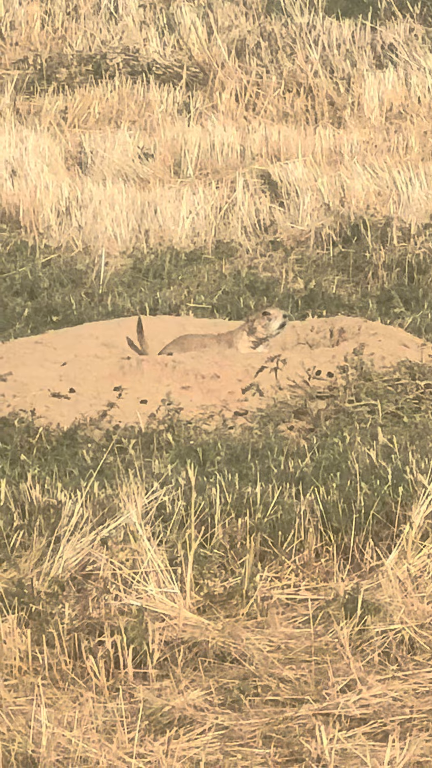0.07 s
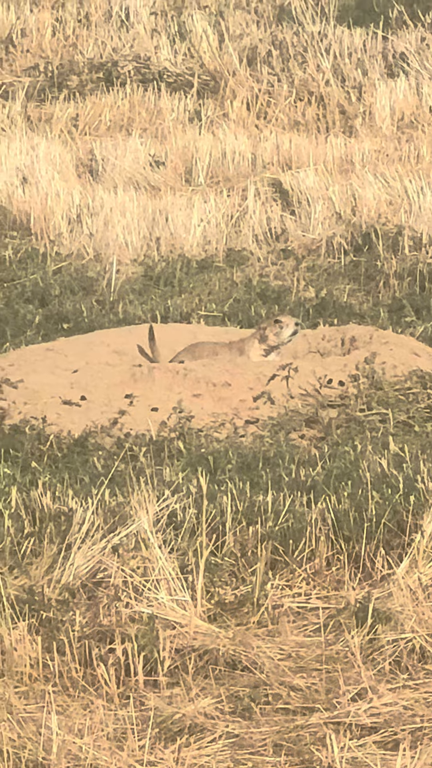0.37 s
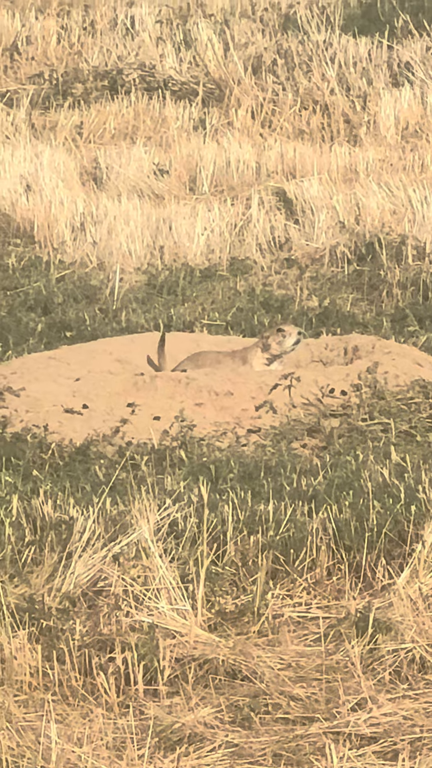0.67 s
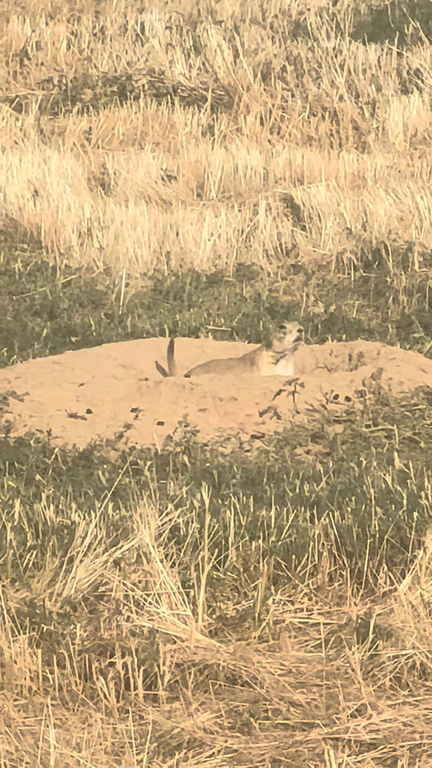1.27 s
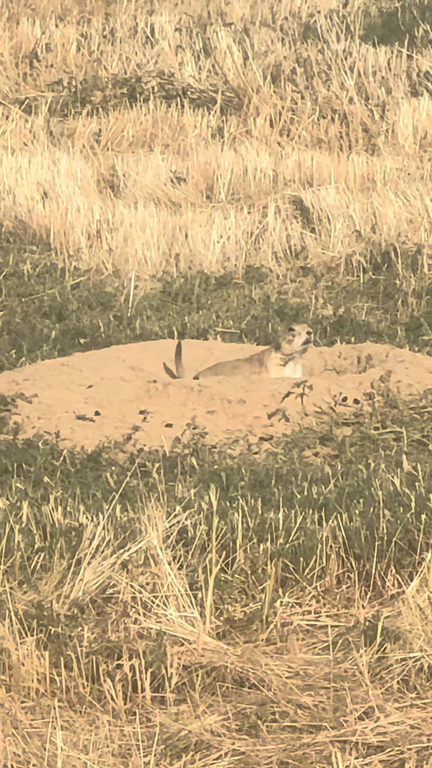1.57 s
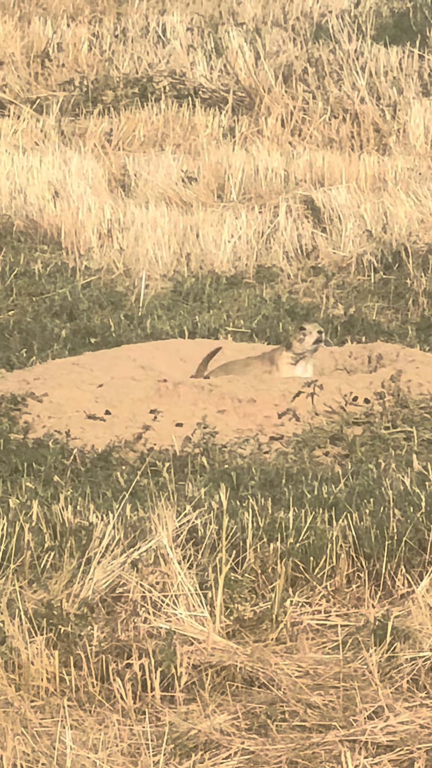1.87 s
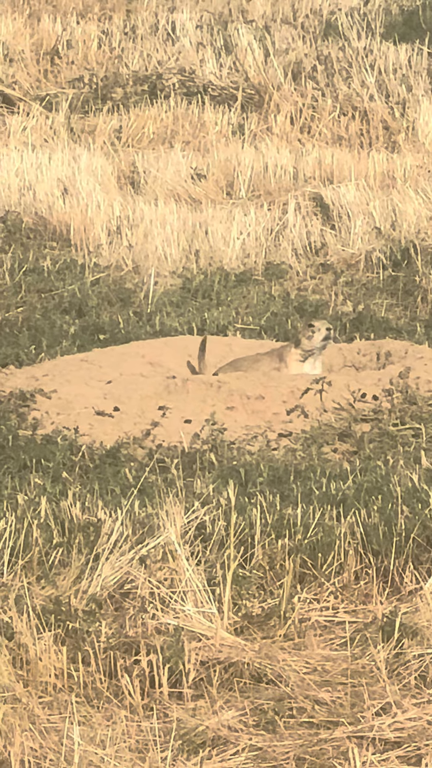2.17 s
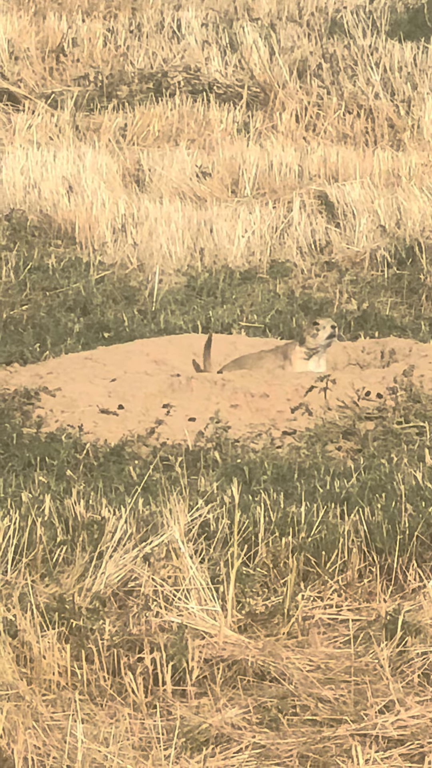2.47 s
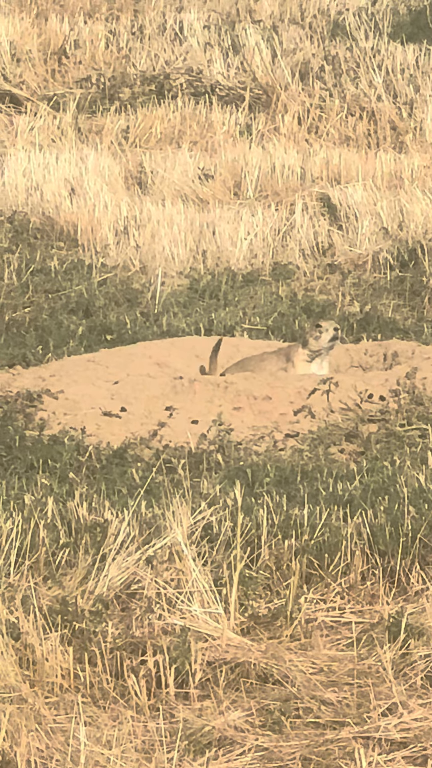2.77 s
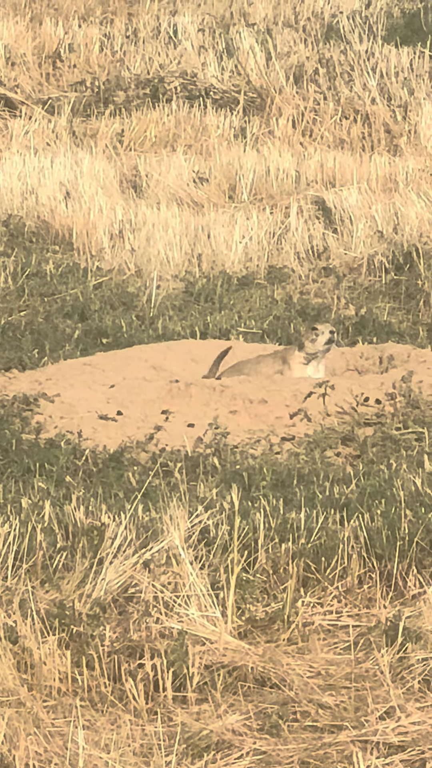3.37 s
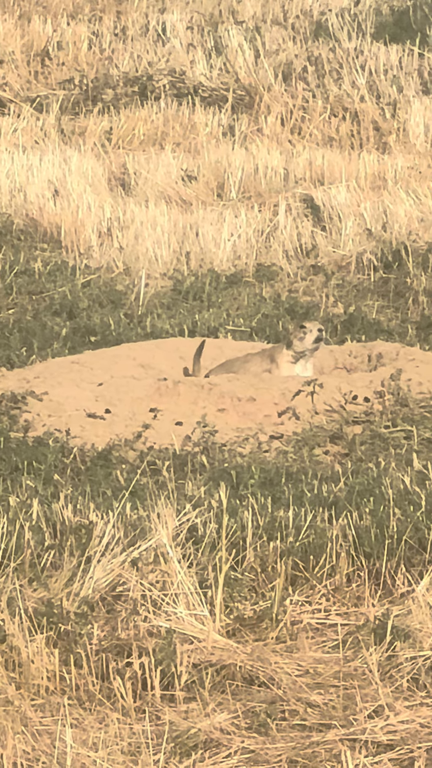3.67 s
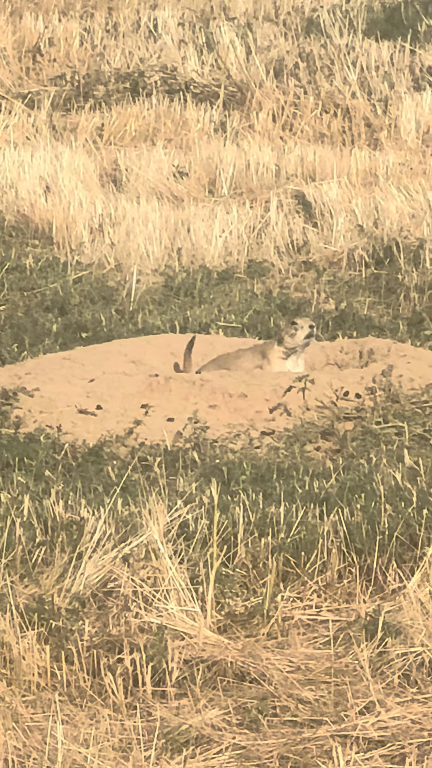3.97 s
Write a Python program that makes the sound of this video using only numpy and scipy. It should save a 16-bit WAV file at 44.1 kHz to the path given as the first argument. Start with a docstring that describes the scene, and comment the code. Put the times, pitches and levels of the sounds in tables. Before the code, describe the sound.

A prairie dog gives twelve short, shrill, slightly raspy barks, about three a second, from 0.1 to 3.7 seconds, loudest near 2 seconds. Another answers very faintly from about 1 second on. Low wind rumbles throughout and buffets the microphone between 2 and 3.2 seconds. A low engine hum and faint distant traffic lie underneath, with a few barely audible dry grass rustles and metal ticks.

```python
"""A prairie dog gives twelve short, shrill alarm barks from its mound; another answers far off.
Each bark rises and falls in pitch, is broken by two rough catches and rings in the animal's throat.
Dry grass rustles, metal ticks faintly, and wind buffets the microphone, hardest in the third second.
Far traffic and an engine hum lie underneath."""
import sys
import numpy as np
from scipy import signal
from scipy.fft import rfft, irfft
from scipy.io import wavfile

SR = 44100
rng = np.random.default_rng(int(sys.argv[2]) if len(sys.argv) > 2 else 0)


def wav_out(sig):
    """Save sig, one row per channel (or a flat mono array), as 16-bit PCM at SR to the path in sys.argv[1]."""
    wavfile.write(sys.argv[1], SR, np.round(np.clip(np.atleast_2d(sig).T, -1, 1) * 32767).astype(np.int16))


N = 176400  # 4 seconds

# The bright hiss in grass rustles and metal ticks. Columns: pitch_hz, level_db
CRISP_HISS = [(2000, -28.5), (4500, -13.5), (6000, 6), (7300, 4), (8700, 1.5), (10000, -5.5),
              (11500, -23.5), (13500, -20.5), (15000, -24), (17000, -32)]


def prairie_dog(t):
    """The near animal barks about three times a second."""
    # One row a bark; the peak is its highest pitch, and the two catches are timed from its start.
    # Columns: start_s, length_s, peak_hz, level_db, peak_place (share of the length),
    # first_catch_s, second_catch_s, roughness (0 to 1)
    barks = [(0.112, .047, 1680, -20.5, .33, 0.0043, .029, 0.66),
             (0.429, 0.046, 1580, -22, .48, 0.0047, 0.014, .45),
             (.777, .044, 1560, -24, .36, .007, 0.022, .9),
             (1.053, 0.048, 1665, -18.5, .42, 0.013, .031, 0.45),
             (1.468, .048, 1700, -17, .42, .016, 0.038, 0.43),
             (1.815, 0.046, 1560, -23, 0.55, 0.0072, .019, .45),
             (2.044, .046, 1710, -14.5, 0.32, .007, .024, 0.35),
             (2.357, .042, 1610, -19, .42, .016, 0.034, 0.58),
             (2.683, .039, 1580, -19.5, .5, 0.0168, .027, .45),
             (3.016, .040, 1600, -18, 0.25, 0.013, .027, 0.33),
             (3.368, 0.038, 1595, -18, 0.35, 0.0078, .016, 0.41),
             (3.691, 0.032, 1575, -18.5, 0.55, 0.0091, 0.011, 0.53)]
    return bark_voice(t, barks)


def bark_voice(t, barks):
    """Vocal folds buzz in an arch of pitch, clear at the top, rough at the ends and in the catches."""
    # How the throat favours some pitches. Columns: pitch_hz, gain_db
    throat = [(600, -41), (1250, -19.5), (1600, -23), (2050, -15), (2600, -1), (3200, -2), (3500, -3),
              (4000, -10), (4800, -8.5), (5200, -16), (5600, -17), (6500, -25), (7300, -44.5), (8300, -46),
              (10000, -43), (11500, -66), (15000, -83)]
    # How the half-closed mouth darkens both ends of a bark. Columns: pitch_hz, gain_db
    half_closed_mouth = [(1600, -3), (2600, 3), (3600, 0), (5000, -5), (6500, -12)]
    # Rushing air before the throat shapes it. Columns: pitch_hz, gain_db
    air_tone = [(1500, 1.5), (2100, -5), (3100, 4), (3800, 3), (5500, 1.5), (7000, -0.5), (9000, -2.5)]
    attack_s, release_s, catch_s = .003, .001, .0018
    sag_drop, catch_drop = .22, .065  # shares of the pitch lost at the ends and in a catch
    sag_db, catch_db, fade_db = -14, -6.5, -13.5
    fade_from = .53  # share of the length
    flutter_share, flutter_db, jitter_share = .011, 2.82, .048
    rasp_hz, breath_db = 561, 4
    pitch, loudness, rasp, closing = np.zeros((4, N))
    for start, length, peak_hz, level_db, peak_place, first, second, roughness in barks:
        on = (t >= start) & (t < start + length)
        age = t[on] - start
        progress = age / length
        # 0 at the top of the arch, 1 at both ends
        sag = np.maximum(1 - progress / peak_place, (progress - peak_place) / (1 - peak_place)) ** 2.5
        catch = bell((age - first) / catch_s) + bell((age - second) / catch_s)
        pitch[on] = peak_hz * (1 - sag_drop * sag - catch_drop * catch)
        edges = np.minimum(age / attack_s, 1) * np.minimum((length - age) / release_s, 1)
        fade = np.maximum(progress - fade_from, 0) / (1 - fade_from)
        loudness[on] = edges * undb(level_db + sag_db * sag + catch_db * catch + fade_db * fade ** 2)
        rasp[on] = roughness * (.3 + 1.36 * np.minimum(sag / 2 + catch + fade, 1))
        closing[on] = sag
    flutter = wander(hz=249)
    phase = phase_of(pitch * (1 + flutter_share * flutter + jitter_share * rasp * wander(hz=1600)))
    # A slower, uneven shake in pitch and strength makes the voice rough.
    shake = rasp * np.sin(phase_of(rasp_hz * (1 + .21 * wander(hz=250))))
    buzz = sum(np.cos(harmonic * (phase + .66 * shake)) for harmonic in range(1, 8)) * (1 + shake)
    air = colour(rng.standard_normal(N), air_tone)
    breath = undb(breath_db) * rasp * air * (1 + np.cos(phase))  # one puff per vibration
    voice = loudness * undb(flutter_db * flutter) * (buzz + breath)
    mouthed = (1 - closing) * voice + closing * colour(voice, half_closed_mouth)
    return colour(mouthed, throat)


def far_neighbour(t):
    """A second prairie dog answers from far away with faint, rough barks."""
    # Its answers. Columns: start_s, level_db
    answers = [(1.12, -52.5), (2.24, -55.5), (2.854, -51), (3.476, -46.5), (3.925, -51)]
    length_s, peak_hz, peak_place, catches_s, roughness = .05, 1780, .5, (.012, .022), .9
    barks = [(start, length_s, peak_hz, db, peak_place, *catches_s, roughness) for start, db in answers]
    return bark_voice(t, barks)


def field_echo(sound, t):
    """Mound and grass scatter a sound briefly, partly from the sides; the field adds a faint tail."""
    def echo(level_db, fade_s):
        """A smear of the sound that falls by 60 dB in fade_s."""
        tail = rng.standard_normal(N) * undb(-60 * t / fade_s)
        return undb(level_db) * signal.fftconvolve(sound, tail / np.linalg.norm(tail))[:N]
    middle = sound + echo(level_db=-13.5, fade_s=.055) + echo(level_db=-36.5, fade_s=.67)
    return middle + to_sides(echo(level_db=-20, fade_s=.055))


def grass(t):
    """Dry stalks brush together in short, crackly rustles, different at each ear."""
    # One row a rustle. Columns: middle_s, half_length_s, level_db
    rustles = [(.55, 0.028, -66), (1.04, .014, -59), (1.362, .018, -65), (2.752, 0.031, -56),
               (3.43, .02, -66)]
    crackle_db = 3
    stir = sum(undb(db) * bell((t - middle) / half_length) for middle, half_length, db in rustles)
    ears = [unit(noise(CRISP_HISS) * undb(crackle_db * wander(hz=300))) for _ in range(2)]
    return stir * np.array(ears)


def metal_ticks(t):
    """A small piece of metal near the microphone is touched lightly and rings unsteadily."""
    # One row a touch. Columns: start_s, level_db
    touches = [(.683, -61), (.71, -68), (0.732, -60), (.774, -50), (.948, -59), (.997, -63), (2.913, -55),
               (2.957, -62), (3.153, -63)]
    # The tones the metal rings with. Columns: pitch_hz, level_db, fade_s (time to fall by 60 dB)
    tones = [(5850, -6, 0.09), (8460, -5, 0.1), (8600, 1, .07), (14400, -13, .06)]
    crack_db, crack_s = 1, .002
    ears = np.zeros((2, N))
    for start, level_db in touches:
        age = np.maximum(t - start, 0)
        ring = sum(undb(db - 60 * age / fade_s) * np.sin(2 * np.pi * (hz * age + rng.random((2, 1))))
                   for hz, db, fade_s in tones)
        crack = undb(crack_db) * np.exp(-age / crack_s) * noise(CRISP_HISS)
        ears += (t >= start) * undb(level_db) * (ring * (1 + .5 * wander(hz=200)) + crack)
    return ears


def wind(t):
    """Wind rumbles on the microphone; each buffet adds a low thump, a snap and small swirls of air."""
    # The tone of the rumble. Columns: pitch_hz, level_db
    rumble_tone = [(15, -39), (27, -22), (40, -0.5), (65, 2), (95, -2.5), (125, -3.5), (165, -9),
                   (220, -16), (300, -25), (450, -46), (900, -77), (4000, -130)]
    # The strength of the wind over time. Columns: time_s, level_db
    gusts = [(0, -29.5), (.7, -32.5), (1.2, -32.5), (1.7, -30), (1.95, -27.5), (2.15, -25), (2.35, -25),
             (2.52, -27.5), (2.8, -23.5), (2.95, -29.5), (3.12, -22), (3.28, -34), (3.7, -28.5), (4, -31.5)]
    # Sudden pushes of air. Columns: middle_s, thump_db, thump_hz, snap_db
    buffets = [(2.046, -24.5, 116, -26.5), (2.083, -12.5, 99.6, -38), (2.129, -15.5, 78.6, -26),
               (2.167, -11.5, 91, -28), (2.25, -22, 138, -22.5), (2.275, -9.5, 70, -28.5),
               (2.342, -15.5, 96, -28.5), (2.625, -33, 113.6, -35.5), (2.724, -20, 104.7, -22.5),
               (2.778, -23, 88.5, -37), (2.808, -11.5, 73, -34), (2.826, -14, 92, -26),
               (2.872, -26.5, 122.4, -26), (2.988, -17, 86, -49), (3.122, -20.5, 99.8, -26),
               (3.164, -20, 100.3, -27.5)]
    # The tone of the swirls. Columns: pitch_hz, level_db
    swirl_tone = [(70, -21), (150, 3), (270, -2.5), (380, -8.5), (500, -16), (750, -33), (1500, -71.5),
                  (5000, -120)]
    swirl_db, swirl_half_s, side_db = -11, .022, -57.5

    def puff(middle, half_s, hz):
        """A few swings of air pressure around one moment."""
        return bell((t - middle) / half_s) * np.sin(2 * np.pi * (hz * (t - middle) + rng.random()))
    rumble = noise(rumble_tone) * undb(np.interp(t, *np.array(gusts).T))
    blows, flurry = np.zeros((2, N))
    for middle, thump_db, thump_hz, snap_db in buffets:
        blows += undb(thump_db) * puff(middle, half_s=.012, hz=thump_hz)
        blows += undb(snap_db) * puff(middle, half_s=.0026, hz=290)
        flurry += undb(snap_db) * bell((t - middle) / swirl_half_s)
    swirls = undb(swirl_db) * flurry * noise(swirl_tone)
    return rumble + blows + swirls + to_sides(undb(side_db) * noise(rumble_tone))


def far_traffic():
    """Far traffic and grass blend into a wide, nearly steady wash of noise."""
    # The tone of the wash. Columns: pitch_hz, level_db
    wash_tone = [(200, -6.5), (320, -1), (480, -4), (820, 0), (1050, -4), (1300, -9.5), (1650, -4),
                 (2100, -3), (2800, -7.5), (3600, -13), (4800, -20), (5800, -20.5), (7000, -18),
                 (8000, -31), (9200, -34.5), (11000, -61.5), (15000, -70)]
    # How wide it sounds. Columns: pitch_hz, side_minus_middle_db
    width = [(200, -1.5), (300, 4), (480, 5), (820, 5), (1380, -4), (2300, -55), (3900, -39.5),
             (6600, -4.5), (8500, 5.5)]
    # How it leans to one ear. Columns: pitch_hz, left_minus_right_db
    lean = [(280, .5), (500, -2.5), (820, -1), (1300, 0.5), (2300, 0)]
    level_db, waver_db = -50.5, .5
    middle, side = noise(wash_tone), colour(noise(wash_tone), width)
    left = colour(middle + side, [(hz, db / 2) for hz, db in lean])
    right = colour(middle - side, [(hz, -db / 2) for hz, db in lean])
    return undb(level_db + waver_db * wander(hz=2)) * np.array([left, right])


def engine_hum(t):
    """An engine hums unsteadily: a low tone and a stronger one an octave above it."""
    # The strength of the hum over time. Columns: time_s, level_db
    levels = [(0, -29.5), (.7, -35.5), (1.4, -27.5), (1.8, -30), (3, -36), (4, -32)]
    low_hz, low_db, drift_share, waver_db = 46.4, -7.5, .0078, 3.5
    phase = phase_of(low_hz * (1 + drift_share * wander(hz=1.87)))
    hum = np.sqrt(2) * (np.sin(2 * phase) + undb(low_db) * np.sin(phase))
    return hum * undb(np.interp(t, *np.array(levels).T) + waver_db * wander(hz=9.1))


def undb(db):
    """Turn decibels into a number to multiply by."""
    return 10 ** (np.asarray(db) / 20)


def unit(sound):
    """Scale a sound to an average strength (rms) of 1."""
    return sound / np.sqrt(np.mean(sound ** 2))


def colour(sound, points):
    """Turn lows and highs up or down along a curve of (pitch_hz, gain_db) points."""
    hz = np.arange(len(sound) // 2 + 1) * SR / len(sound)
    point_hz, point_db = np.array(points).T
    gain_db = np.interp(np.log(np.maximum(hz, 1)), np.log(point_hz), point_db)
    return irfft(rfft(sound) * undb(gain_db), len(sound))


def noise(points):
    """Noise of strength 1; the points set only its tone."""
    return unit(colour(rng.standard_normal(N), points))


def wander(hz):
    """A smooth random wobble of strength 1, with up to about hz swings a second."""
    rates = np.arange(N // 2 + 1) * SR / N
    return unit(irfft(rfft(rng.standard_normal(N)) * np.exp(-(rates / hz) ** 2), N))


def bell(x):
    """A smooth bump around zero."""
    return np.exp(-.5 * x ** 2)


def phase_of(pitch_hz):
    """The running angle of a vibration whose pitch changes."""
    return 2 * np.pi * np.cumsum(pitch_hz) / SR


def to_sides(sound):
    """Give the two ears opposite signs, which sounds wide."""
    return np.array([sound, -sound])


def scene():
    """The animal straight ahead, its neighbour far off, wind at the microphone, traffic all round."""
    t = np.arange(N) / SR
    barks = field_echo(prairie_dog(t) + far_neighbour(t), t)
    return barks + grass(t) + metal_ticks(t) + far_traffic() + engine_hum(t) + wind(t)


def record(dry):
    """The recorder cuts off the highest treble."""
    top_hz = 15800
    return signal.sosfilt(signal.ellip(8, .2, 70, top_hz, fs=SR, output="sos"), dry)


dry = scene()
out = record(dry)
wav_out(out)
```